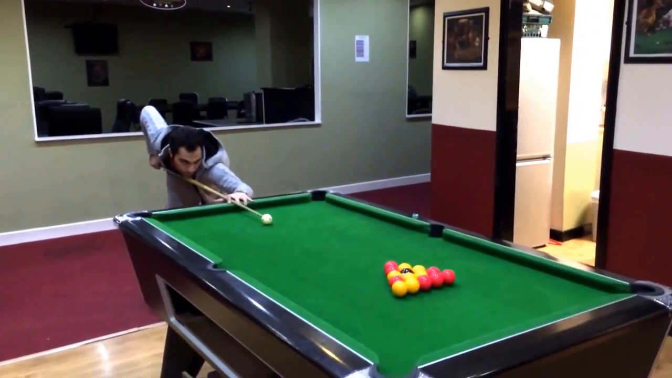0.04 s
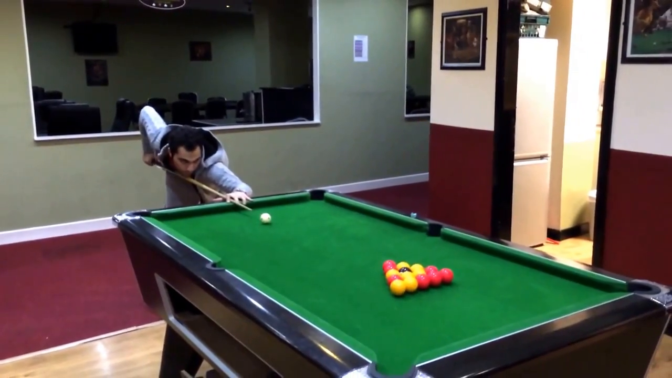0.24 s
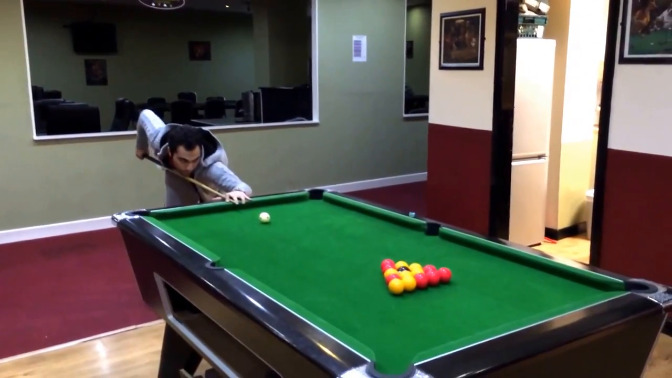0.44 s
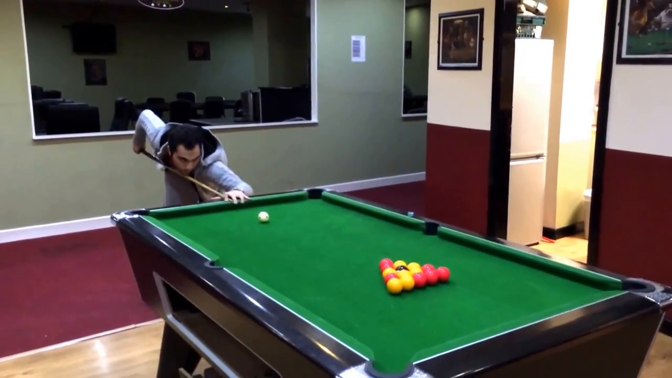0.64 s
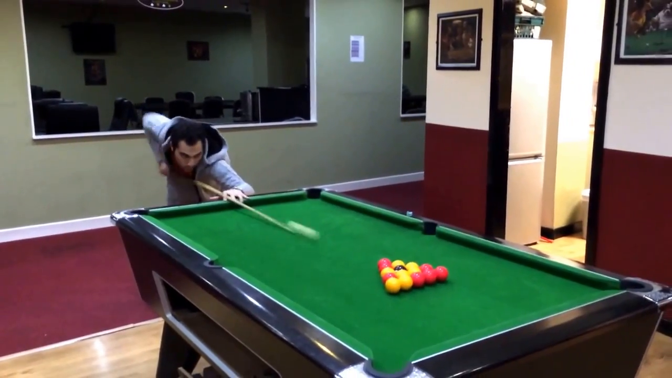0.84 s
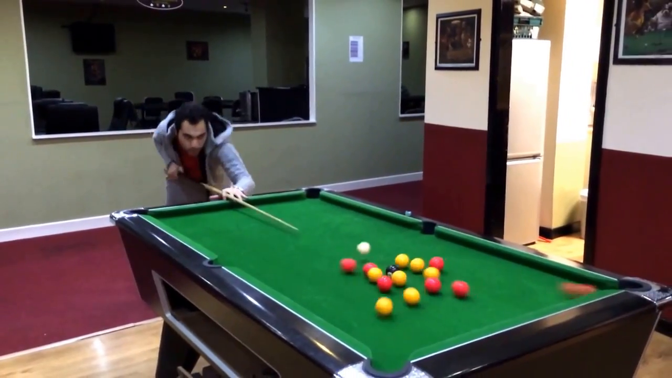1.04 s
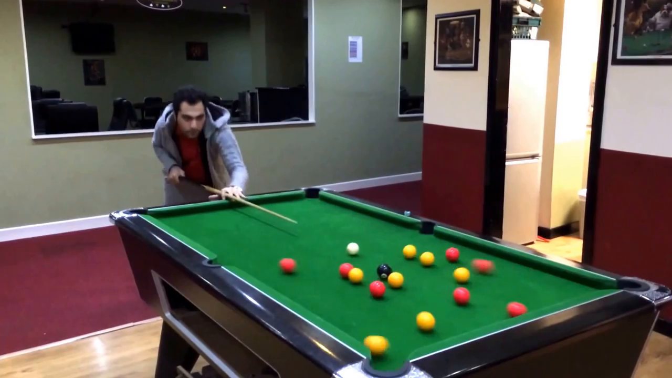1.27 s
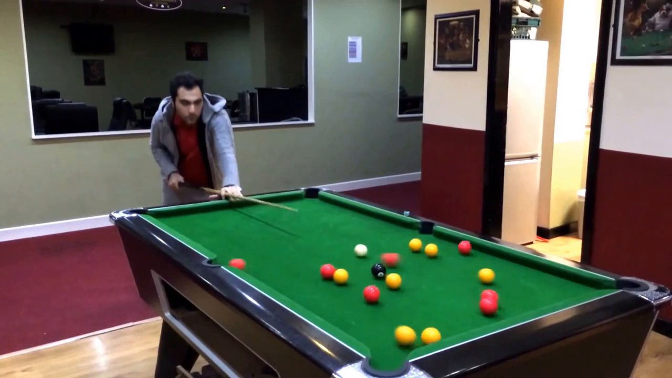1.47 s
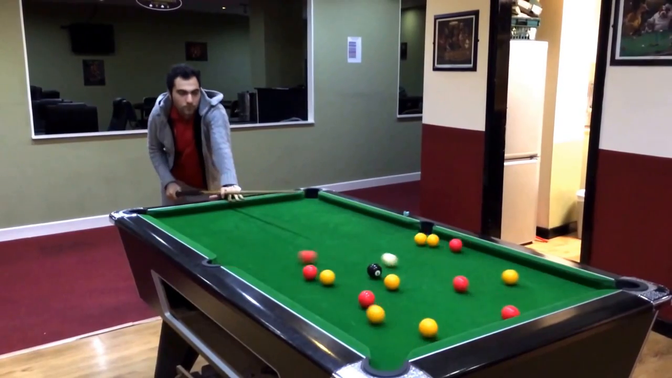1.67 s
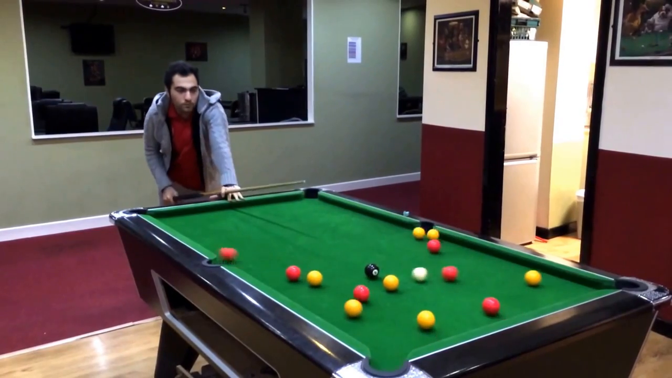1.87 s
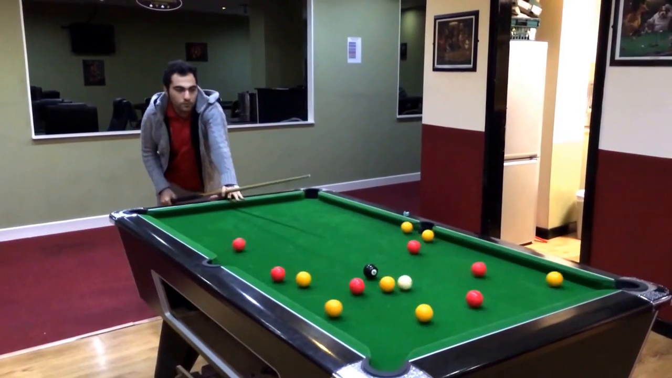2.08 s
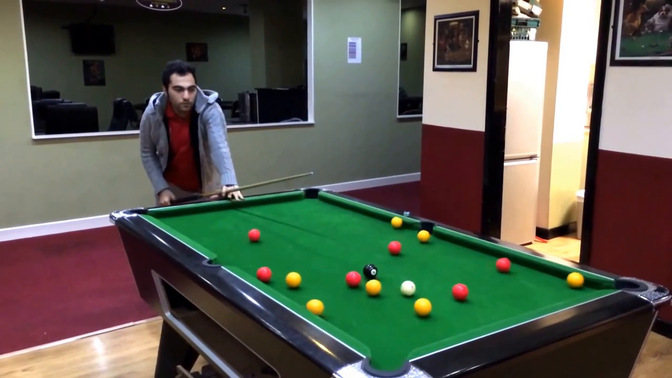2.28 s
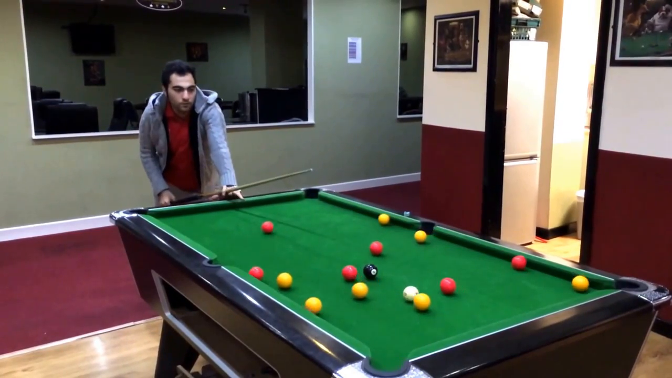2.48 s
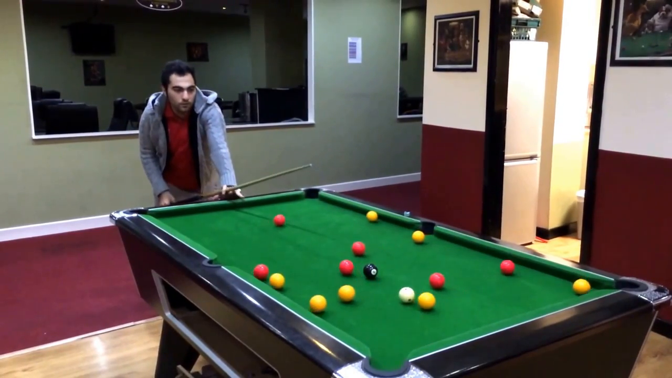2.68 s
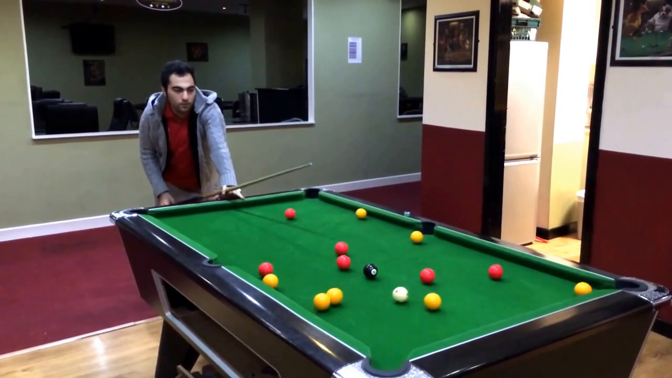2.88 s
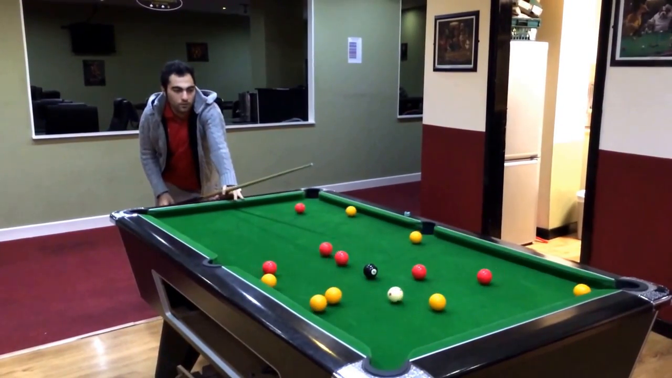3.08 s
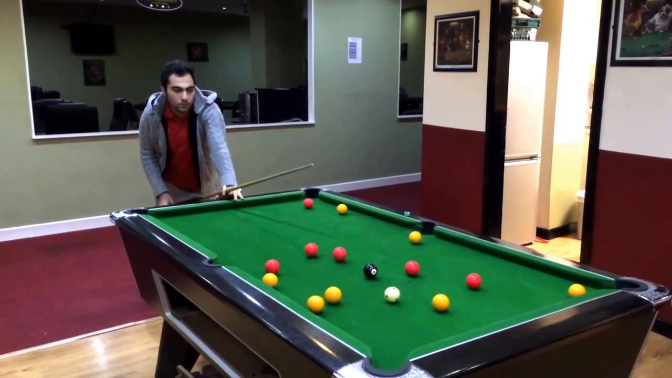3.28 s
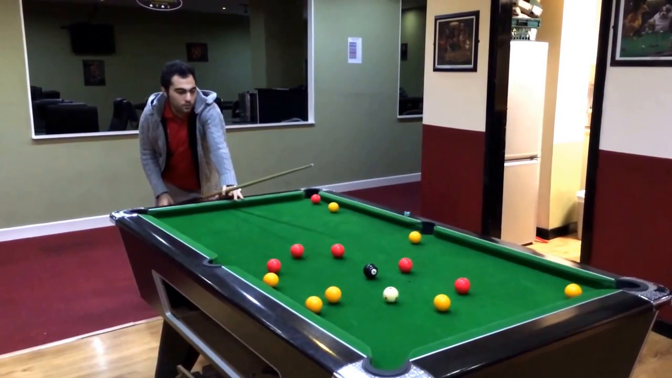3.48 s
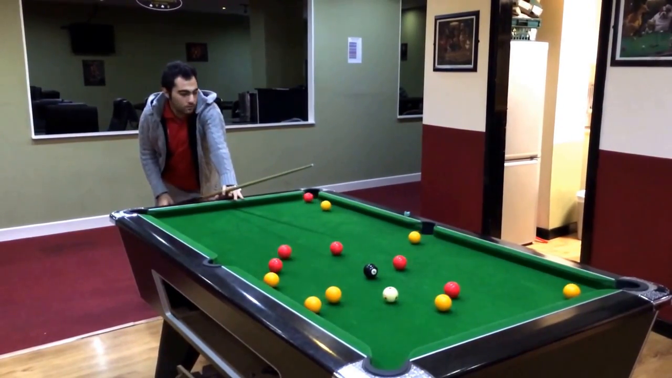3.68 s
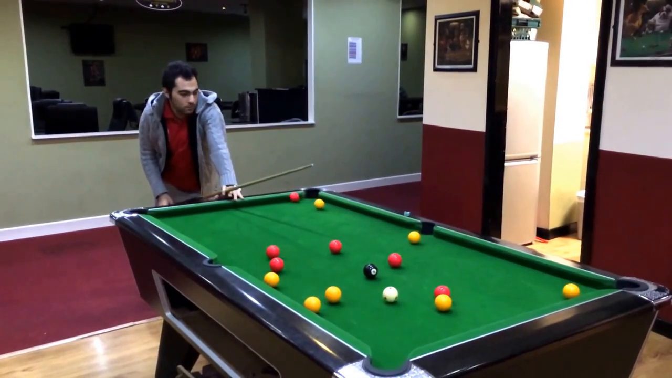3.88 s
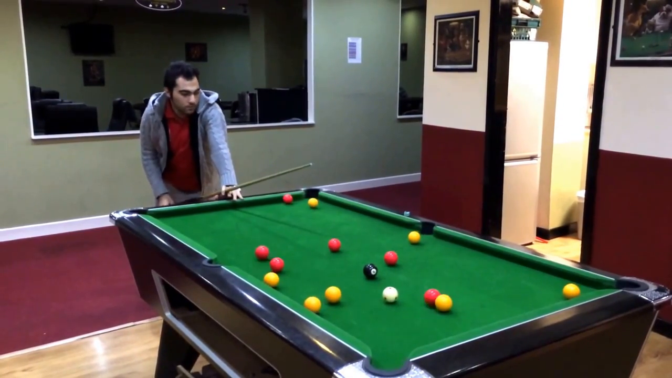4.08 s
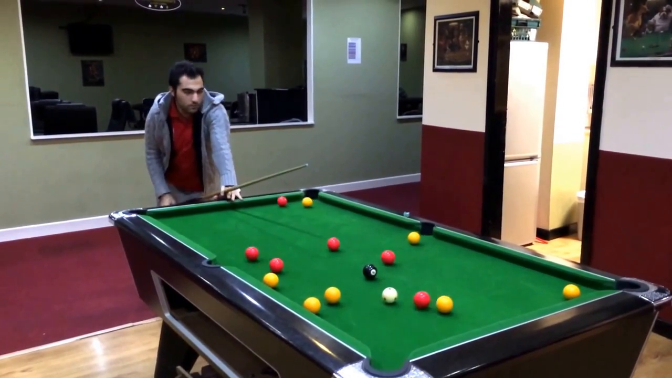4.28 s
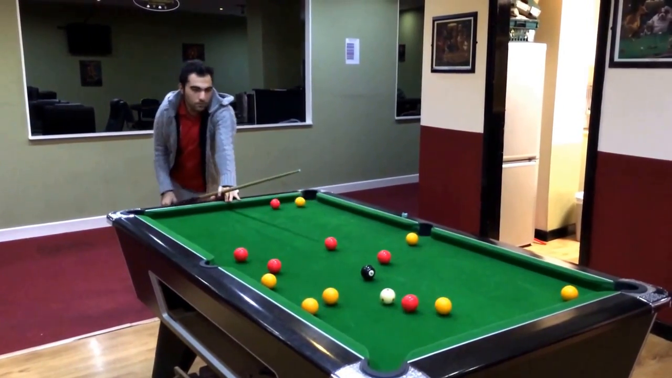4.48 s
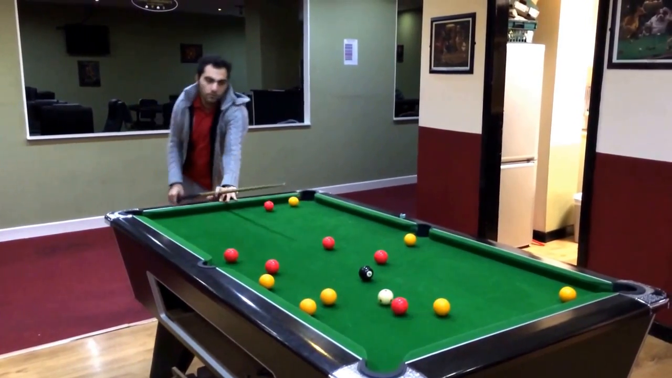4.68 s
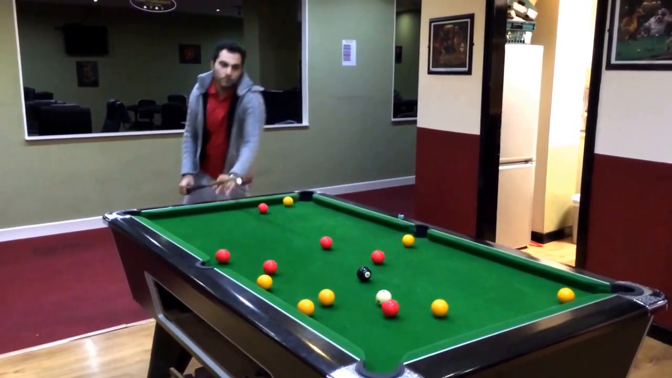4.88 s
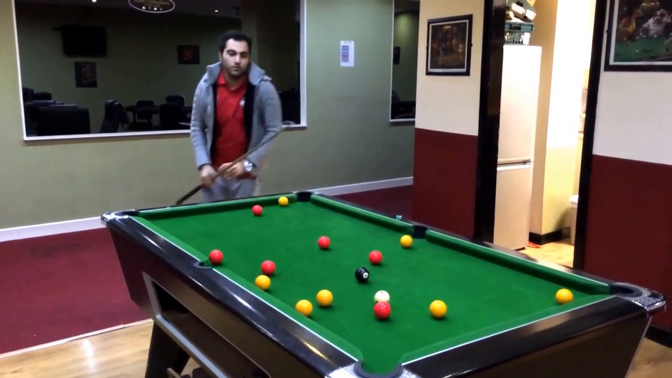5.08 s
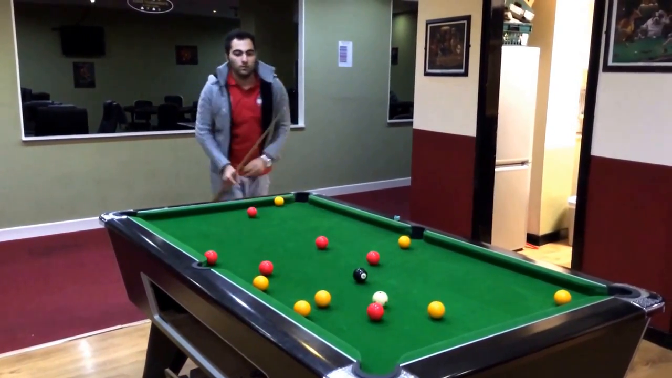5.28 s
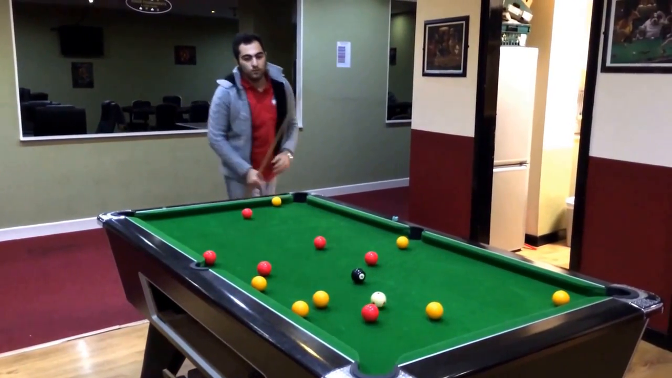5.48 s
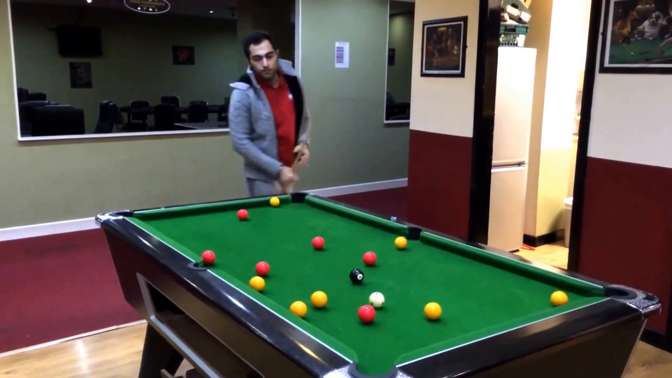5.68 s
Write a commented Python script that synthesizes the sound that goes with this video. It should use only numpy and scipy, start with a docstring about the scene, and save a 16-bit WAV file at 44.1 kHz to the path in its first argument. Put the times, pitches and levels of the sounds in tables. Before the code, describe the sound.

A hard pool break cracks and scatters balls that click and thump the cushions, then one rolls and knocks down through the table.

```python
"""A break shot on a pool table in a club room, over a low ventilation hum of coloured noise bands.
The cue cracks and rings (pulse, knocks and decaying modes) as rolling noise begins; the rack bursts in a
swarm of pulses, then balls click together and thump the cushions with filtered noise bursts and booms.
A potted ball knocks and rolls down the return channel inside the cabinet, rattles a rail and bounces in
the tray; the player's jacket rustles in swells of hiss and footsteps sound as soft, dull noise bursts."""
import sys
import numpy as np
from scipy import signal
from scipy.fft import rfft, irfft
from scipy.io import wavfile
from scipy.ndimage import uniform_filter1d, minimum_filter1d

SR = 44100
rng = np.random.default_rng(int(sys.argv[2]) if len(sys.argv) > 2 else 0)


def persist_wave(psi):
    """Save psi, clipped to +-1, as 16-bit WAV."""
    counts = np.round(np.clip(psi, -1, 1) * 32767).astype(np.int16)
    wavfile.write(sys.argv[1], SR, np.atleast_2d(counts).T)


N = 253134
TIME = np.arange(N) / SR  # seconds through the scene
AFTER = np.arange(int(SR * .7)) / SR  # seconds after a blow

# Spectrum of the ventilation's rush of air, before levelling: [f/Hz, level/dB]
AIR_SPECTRUM = [(25, -19.5), (40, -3), (90, -4), (170, 2.5), (400, -4.5), (550, -10.5), (1900, -17.5),
                (2600, -25), (5000, -34), (15500, -46)]
# Fan tones of the ventilation, before a common trim: [f/Hz, rms level/dB]
FAN_TONES = [(215.3, -54), (436.0, -60.5), (608.3, -67.5), (872.1, -70.5)]
# Runs of rolling, from cloth through pocket and channel to tray:
# [start t/s, end of hold t/s, rumble level/dB, cabinet drone level/dB]
ROLL_RUNS = [(0.855, 0.96, -32.5, -51), (1.107, 1.37, -41, -45.5), (1.73, 1.854, -36.5, -34.5),
             (1.892, 2.013, -36.5, -49), (2.209, 2.512, -48.5, -53.5), (2.687, 2.927, -43.5, -32),
             (2.983, 3.033, -35.5, -25.5), (3.092, 3.248, -37.5, -50), (4.292, 4.393, -27.5, -33.5)]
# Spectrum of the rolling rumble, before levelling: [f/Hz, level/dB]
ROLL_SPECTRUM = [(30, -20.5), (90, 1.5), (180, -1), (300, -3.5), (420, -4), (700, -9), (1100, -10.5),
                 (2200, -23.5), (4000, -33.5), (9000, -62)]
# Ringing modes of the cue shot, before a common trim and damping: [f/Hz, level/dB, undamped t60/s]
CUE_MODES = [(780, -13, .15), (1180, -13, .25), (1650, -7, 0.51), (1853, 1, 0.22), (2680, -19.5, 0.18),
             (3045, 0.5, 0.18), (3580, -11.5, .19), (3660, -14.5, .22), (4800, -11, .14),
             (5370, -17.5, .17)]
# Balls strike slate, cushions and pocket: [t/s, wood level/dB, hard clatter level/dB]
TABLE_KNOCKS = [(0.9500, -32, -63), (1.1635, -19.5, -87), (1.2655, -31, -82), (1.5320, -53, -50.5),
                (1.6560, -20.5, -43), (1.7265, -18, -21), (1.7660, -22.5, -33.5), (1.8020, -22, -34),
                (1.8880, -29.5, -30.5)]
# Balls land on the slate or nudge a cushion, heard only as a boom: [t/s, level/dB]
TABLE_NUDGES = [(0.982, -30), (1.365, -33), (1.398, -26), (1.475, -32.5), (1.541, -32), (1.999, -28.5),
                (2.055, -34.5)]
# Basic spectrum of struck wood, before levelling: [f/Hz, level/dB]
WOOD_SPECTRUM = [(30, -21), (80, -17.5), (150, -1.5), (280, -0.5), (450, -2), (700, 1), (1200, 0),
                 (3000, 0.5), (16000, -32)]
# Basic spectrum of hard clatter, before levelling: [f/Hz, level/dB]
CLATTER_SPECTRUM = [(200, -22.5), (900, 6.5), (2000, 6), (3800, -1), (5500, -3.5), (8000, -12.5),
                    (16000, -28)]
# Resonances of the cushion rails: [f/Hz, width/Hz, lift above the rest/dB]
CUSHION_RESONANCES = [(354, 60, 9), (785, 30, 7), (920, 28, 3), (1000, 120, 8)]
# Ball on ball: [t/s, level/dB, room send/dB]
BALL_CLICKS = [(0.9968, 1.5, 5), (1.0067, -8.5, -12), (1.0223, -3, -14), (1.0226, -4.5, -14),
               (1.0272, -11, -16), (1.4540, -7, -13), (1.5331, -23.5, 3.5), (1.5443, -18.5, -27),
               (1.8346, -2, -13.5), (1.9200, -7, -4), (2.1211, -18, -5), (2.967, -21.5, -10),
               (4.1160, -36, -10), (5.304, -46.5, 7)]
# Early echoes of the clicks from table, walls and ceiling: [delay t/s, level/dB]
EARLY_ECHOES = [(.0009, -3.5), (.0039, -13), (.0068, -17), (0.0091, -11), (0.0145, -19.5), (.0245, -19)]
# The potted ball knocks along the return channel: [t/s, wood level/dB, hard clatter level/dB]
RETURN_KNOCKS = [(2.5680, -22, -25), (2.5745, -14, -46.5), (2.5910, -15.5, -45), (2.6940, -22, -68),
                 (2.8000, -13.5, -28), (2.9760, -20, -72), (3.0140, -22.5, -79), (3.0635, -28.5, -34.5),
                 (3.1670, -27.5, -51)]
# Resonances of the hollow wooden cabinet: [f/Hz, width/Hz, lift above the rest/dB]
CABINET_RESONANCES = [(382, 78, 12), (471, 5.8, 5.5), (550, 23, 14.5), (1480, 150, 4)]
# The ball meets a metal rail in the channel: [t/s, level/dB]
RAIL_STRIKES = [(3.0632, -29), (3.178, -30.5)]
# Resonances of that rail, before levelling: [f/Hz, width/Hz, level/dB]
RAIL_RESONANCES = [(2214, 115, 5), (2464, 84, 4), (2845, 170, -3), (3600, 430, -9), (4060, 250, -7.5)]
# The ball tips into the open tray and bounces: [t/s, wood level/dB, hard clatter level/dB]
TRAY_BOUNCES = [(4.2090, -34, -50), (4.2630, -33, -43), (4.2835, -22.5, -22.5), (4.3220, -19.5, -30),
                (4.3710, -24, -27.5), (4.4150, -27.5, -37.5)]
# Resonances of the tray: [f/Hz, width/Hz, lift above the rest/dB]
TRAY_RESONANCES = [(162, 48, 4), (504, 200, 2)]
# The jacket rustles as the player straightens up: [t/s, level at the crest of the swell/dB]
JACKET_RUSTLES = [(4.79, -73.5), (5.15, -68.5), (5.31, -72), (5.51, -68)]
# Footsteps on the floor: [t/s, thud level/dB, scuff level/dB]
FOOTSTEPS = [(4.840, -34, -57), (4.885, -41.5, -56), (4.980, -34, -58), (5.150, -38.5, -59.5),
             (5.563, -30, -51), (5.592, -38, -62.5)]
# Spectrum of a sole on the floor, before its contact corner and levelling: [f/Hz, level/dB]
SOLE_SPECTRUM = [(30, -31.5), (120, 9.5), (260, -5.5), (370, 4), (600, -2.5), (4000, 10)]
# Reverberation of the room: [f/Hz, t60/s]
ROOM_DECAY = [(100, 0.63), (400, 0.46), (1500, 0.27), (3000, 0.35), (6000, 0.26), (14000, 0.29)]

# a harder click has a shorter contact and a higher pitch; balls still packed in the rack sound higher again
CLICK_HZ, CLICK_HZ_PER_DB, PACKED_HZ = 2116, 1, 2740
RACK_START_S, RACK_SPREAD_S = 1.0, .055
ROLL_RISE_S, ROLL_FADE_DB_PER_S = 0.019, 170.5
DRONE_HZ, DRONE_HALF_WIDTH_HZ = 191, 22
EDGE_HZ = 15600  # upper band limit


def gain_of(db):
    """Turns decibels into amplitude."""
    return 10 ** (np.asarray(db) / 20)


def evened(x):
    """Scales a signal to rms 1."""
    return x / np.sqrt(np.mean(x ** 2) + 1e-20)


def read(points, hz):
    """Reads a table on a log-frequency axis."""
    f, value = np.transpose(points)
    return np.interp(np.log(hz + 1), np.log(f + 1), value)


def add(mix, s, sound):
    """Mixes a sound in at time s."""
    part = mix[round(s * SR):][:len(sound)]
    part += sound[:len(part)]


def noise(colour, size):
    """Makes noise of rms 1 with the dB spectrum colour(hz)."""
    hz = np.fft.rfftfreq(size, 1 / SR)
    spectrum = rfft(rng.standard_normal(size)) * gain_of(colour(hz))
    return evened(irfft(spectrum, size))


def contact_db(hz, hard_hz, steepness=5):
    """A soft contact lasts longer and excites little above its corner."""
    return -10 * np.log10(1 + (hz / hard_hz) ** steepness)


def swelling(swell):
    """An envelope that peaks at 1 after swell seconds, then fades."""
    u = AFTER / swell
    return u * np.exp(1 - u)


def burst(colour, t60, rise, uneven_db=5.0):
    """Many close modes struck together swell and die; each point of impact favours other ones."""
    def struck(hz):
        favour = evened(uniform_filter1d(rng.standard_normal(len(hz)), size=110))
        return colour(hz) + uneven_db * favour
    shape = gain_of(-60 * AFTER / t60) * (1 - np.exp(-AFTER / rise))
    # a longer decay carries more energy
    return evened(noise(struck, len(AFTER)) * shape) * np.sqrt(np.mean(shape ** 2))


def ring(modes, damping, rise):
    """A few separate modes die away; damping divides their decay times."""
    tone = np.zeros(len(AFTER))
    for hz, db, t60 in modes:
        decay = gain_of(db - 60 * damping * AFTER / t60)
        tone += decay * np.sin(2 * np.pi * (hz * AFTER + rng.random()))
    return tone * (1 - np.exp(-AFTER / rise))


def pulse(s, hz, cycles, softness=6):
    """A ball jolted at time s pushes and pulls the air; softer means less treble: (start, sound)."""
    t = AFTER[:len(AFTER) // 80] - .004  # begins 4 ms before the jolt
    envelope = 1 / np.cosh(t * hz / cycles / np.sqrt(softness)) ** softness
    return s + t[0], np.sin(2 * np.pi * hz * t) * envelope


def knock(body, wood_db, clatter_db, hard_hz, t60, rise, cover=lambda hz: 0):
    """A blow shakes a body, up to the corner of its contact, and sets off a bright clatter."""
    wood = burst(lambda f: body(f) + contact_db(f, hard_hz, steepness=5.23), t60, rise, uneven_db=3.5)
    clatter = burst(lambda f: read(CLATTER_SPECTRUM, f) + cover(f), 0.66 * t60, rise=.0006, uneven_db=2.5)
    return gain_of(wood_db) * wood + gain_of(clatter_db) * clatter


def blows(rows, body, hard_hz, octave_db, t60, rise, cover=lambda hz: 0):
    """Knocks on one body: the strongest reaches hard_hz; each octave_db weaker is an octave duller."""
    out = np.zeros(N)
    strongest_db = max(row[1] for row in rows)
    for s, db, clatter_db in rows:
        corner_hz = hard_hz * 2 ** ((db - strongest_db) / octave_db)
        add(out, s, knock(body, db, clatter_db, corner_hz, t60, rise, cover))
    return out


def booms(rows, hz, swell, detune=0.072, count=5):
    """After each blow a cluster of low panel modes swells, beats and fades."""
    out = np.zeros(N)
    weights = signal.windows.hann(count + 2)[1:-1]
    for s, db, *_ in rows:
        offsets = np.linspace(-1, 1, count) + rng.uniform(-0.84, 1.0, count)
        modes_hz = hz * (1 + detune * offsets)
        modes = np.sin(2 * np.pi * np.outer(modes_hz, AFTER - swell))
        tone = weights @ modes / weights.sum()
        add(out, s, gain_of(db) * swelling(swell) * tone)
    return out


def body_db(resonances, hz):
    """A wooden body is the basic wood spectrum lifted at its resonances."""
    lift = sum(db / (1 + (2 * (hz - f) / width) ** 2) for f, width, db in resonances)
    return read(WOOD_SPECTRUM, hz) + lift


def table_db(hz):
    """The body of the table resonates in its cushion rails."""
    return body_db(CUSHION_RESONANCES, hz)


def cabinet_db(hz):
    """The body of the cabinet resonates as a hollow box."""
    return body_db(CABINET_RESONANCES, hz)


def ventilation(rush_db=-51.5, hum_trim_db=-1, waver_hz=5):
    """A soft rush of air with fan tones, each a narrow noise band and so wavering."""
    tones = np.zeros(N)
    for hz, db in FAN_TONES:
        band = noise(lambda f: contact_db(abs(f - hz), waver_hz, steepness=3.0), N)
        tones += gain_of(db) * band
    rush = noise(lambda f: read(AIR_SPECTRUM, f), N)
    return gain_of(rush_db) * rush + gain_of(hum_trim_db) * tones


def rolling(bumps_db=0.5):
    """Each run swells, holds and fades: a rumble and the drone of the cabinet, made uneven by small bumps."""
    rumble_level, drone_level = np.zeros((2, N))
    for start, end, rumble_db, drone_db in ROLL_RUNS:
        rise = np.clip((TIME - start) / ROLL_RISE_S, 0, 1)
        run = rise * gain_of(-ROLL_FADE_DB_PER_S * np.maximum(TIME - end, 0))
        rumble_level = np.maximum(rumble_level, gain_of(rumble_db) * run)
        drone_level = np.maximum(drone_level, gain_of(drone_db) * run)
    bumps = gain_of(bumps_db * noise(lambda f: contact_db(f, hard_hz=23), N))
    drone = noise(lambda f: contact_db(abs(f - DRONE_HZ), DRONE_HALF_WIDTH_HZ, steepness=4), N)
    rumble = noise(lambda f: read(ROLL_SPECTRUM, f), N)
    return bumps * (rumble_level * rumble + drone_level * drone)


def cue(tip_db=-4, tip_hz=950, ring_db=-11.0):
    """The tip punches the ball into the slate; the shaft rattles and rings on."""
    out = np.zeros(N)
    start, punch = pulse(.8742, tip_hz, cycles=0.52)
    add(out, start, gain_of(tip_db) * punch)
    add(out, .8735, knock(table_db, wood_db=-17.5, clatter_db=-18.0, hard_hz=1710, t60=0.067, rise=.0007))
    add(out, .8840, knock(table_db, wood_db=-25, clatter_db=-13.5, hard_hz=2500, t60=.17, rise=.0007))
    add(out, .876, gain_of(ring_db) * ring(CUE_MODES, damping=2.0, rise=0.0018))
    return out


def table(boom_db=-17):
    """Balls knock slate, cushions and pocket; the first click also jolts the slate: (knocks, boom)."""
    knocks = blows(TABLE_KNOCKS, table_db, hard_hz=1580, octave_db=21, t60=.23, rise=.0007)
    jolt = knock(table_db, wood_db=-22.5, clatter_db=-28.5, hard_hz=1500, t60=.26, rise=.0007)
    add(knocks, BALL_CLICKS[0][0], jolt)
    knock_boom = gain_of(boom_db) * booms(TABLE_KNOCKS, hz=100.6, swell=0.029)
    nudge_boom = booms(TABLE_NUDGES, hz=110, swell=0.02, detune=.2)
    return knocks, knock_boom + nudge_boom


def balls(chip_db=-37, chip_growth=1.7):
    """Each collision is one short pulse; hard ones gain a bright edge: (sound with echoes, feed to the room)."""
    direct, feed = np.zeros((2, N))
    for s, db, send_db in BALL_CLICKS:
        packed = 0 < s - RACK_START_S < RACK_SPREAD_S
        hz = PACKED_HZ if packed else CLICK_HZ + CLICK_HZ_PER_DB * db
        start, click = pulse(s, hz, cycles=0.37)
        chip = burst(lambda f: read(CLATTER_SPECTRUM, f) / 2, t60=.012, rise=0.00022)
        # the bright chip grows faster than the click itself
        chip_gain = gain_of(chip_db + chip_growth * db)
        for at, sound in (start, gain_of(db) * click), (s, chip_gain * chip):
            add(direct, at, sound)
            add(feed, at, gain_of(send_db) * sound)
    out = direct.copy()
    for delay, db in EARLY_ECHOES:
        add(out, delay, gain_of(db) * direct)
    return out, feed


def rack(db=-18.5, hz=2500, fade_db=6, count=36):
    """The blow runs through the packed balls as a fading swarm of hard little collisions."""
    out = np.zeros(N)
    for k, (late, size, tone) in enumerate(rng.random((count, 3))):
        age = (k + late) / count  # 0 to 1 through the burst
        s = RACK_START_S + RACK_SPREAD_S * age
        at, click = pulse(s, hz * (1 + 0.49 * (tone - .5)), cycles=0.35, softness=0.99)
        level_db = db - fade_db * age + 3.8 * (size - 1.0)
        add(out, at, gain_of(level_db) * click)
    return out


def channel(boom_db=-11, muffle_hz=6500):
    """The ball knocks inside the cabinet, whose walls dull the clatter: (knocks, boom)."""
    knocks = blows(RETURN_KNOCKS, cabinet_db, hard_hz=1480, octave_db=11.5, t60=0.21, rise=0.0012,
                   cover=lambda f: contact_db(f, muffle_hz, steepness=6.5))
    # the panels boom only once the ball is well inside
    boom = gain_of(boom_db) * booms(RETURN_KNOCKS[3:], hz=104, swell=0.016)
    return knocks + rail(), boom


def rail(t60=0.2, gap_db=-17):
    """The metal rail rattles in a few broad resonances, with quieter clatter between them."""
    def colour(f):
        peaks = sum(gain_of(db) / (1 + (2 * (f - hz) / width) ** 2) for hz, width, db in RAIL_RESONANCES)
        return 20 * np.log10(peaks + gain_of(gap_db + read(CLATTER_SPECTRUM, f)))
    out = np.zeros(N)
    for s, db in RAIL_STRIKES:
        add(out, s, gain_of(db) * burst(colour, t60, rise=0.0015))
    return out


def tray(boom_db=-4, landing_db=-16):
    """The ball lands heavily in the open tray, which booms as it bounces: (knocks, boom)."""
    knocks = blows(TRAY_BOUNCES, lambda f: body_db(TRAY_RESONANCES, f),
                   hard_hz=630, octave_db=34, t60=0.22, rise=0.0023)
    landing = booms([(4.286, landing_db)], hz=119.3, swell=.015, detune=.45)
    bounces = gain_of(boom_db) * booms(TRAY_BOUNCES[1:], hz=135, swell=0.0181)
    return knocks, landing + bounces


def jacket(swell=0.024, low_hz=5500):
    """Each rustle of cloth is a faint high hiss that swells and fades."""
    out = np.zeros(N)
    for s, db in JACKET_RUSTLES:
        # swapping corner and frequency turns the treble cut into a bass cut
        hiss = noise(lambda f: contact_db(low_hz, f + 1, steepness=3), len(AFTER))
        add(out, s, gain_of(db) * swelling(swell) * hiss)
    return out


def footsteps():
    """A soft sole thuds on the floor with a faint bright scuff."""
    return blows(FOOTSTEPS, lambda f: read(SOLE_SPECTRUM, f), hard_hz=368, octave_db=17, t60=.22, rise=0.0033)


def room(x, gap=0.0066, build=0.0033):
    """Scattered reflections build up after a gap, each band dying at its own speed."""
    size = len(AFTER)
    present = rng.standard_normal(size) * (rng.random(size) < 3000 / SR)  # about 3000 reflections a second
    taps = present * np.clip((AFTER - gap) / build, 0, 1)
    hz, t, bands = signal.stft(taps, SR, nperseg=256)
    decay = gain_of(-60 * t / read(ROOM_DECAY, hz)[:, None])
    tail = signal.istft(bands * decay, SR, nperseg=256)[1]
    return signal.fftconvolve(x, tail / np.linalg.norm(tail))[:N]


def scene(cue_room_db=-9, table_room_db=-9, rack_room_db=10):
    """Mixes all sources with the echo of the room; booms, rolling, jacket and air stay out of the echo."""
    clicks, click_feed = balls()
    shot, swarm = cue(), rack()
    knocks, boom = np.sum([table(), channel(), tray()], axis=0)
    thuds = knocks + footsteps()
    feed = click_feed + gain_of(rack_room_db) * swarm
    feed = feed + gain_of(cue_room_db) * shot + gain_of(table_room_db) * thuds
    struck = shot + swarm + clicks + thuds + boom
    return (struck + rolling() + jacket() + ventilation() + room(feed))[None]


def record(dry):
    """A quick limiter holds peaks at full scale; then a low-pass sets the band limit."""
    needed = 1 / np.maximum(abs(dry), 1)
    gain = uniform_filter1d(minimum_filter1d(needed, size=89), size=89)  # about 2 ms
    low_pass = signal.firwin(511, EDGE_HZ, window=("kaiser", 9), fs=SR)
    return signal.oaconvolve(dry * gain, low_pass[None], "same")


dry = scene()
out = record(dry)
persist_wave(out)
```